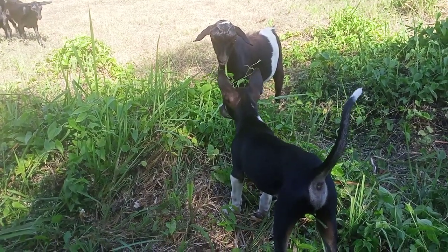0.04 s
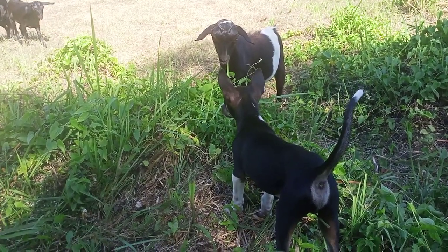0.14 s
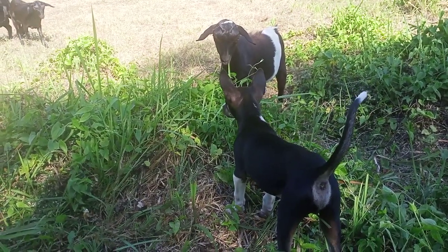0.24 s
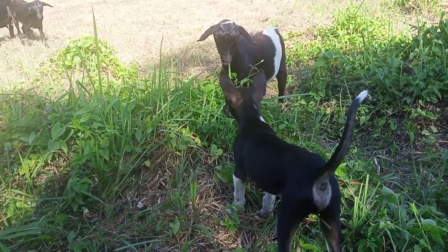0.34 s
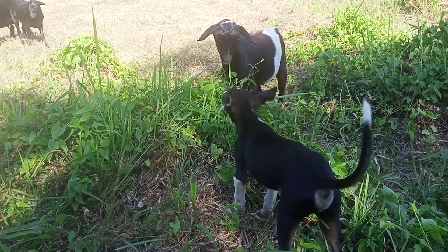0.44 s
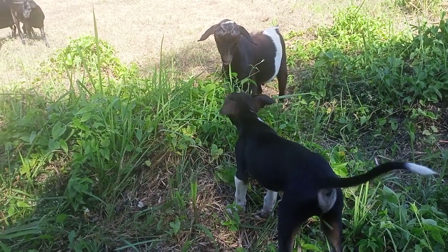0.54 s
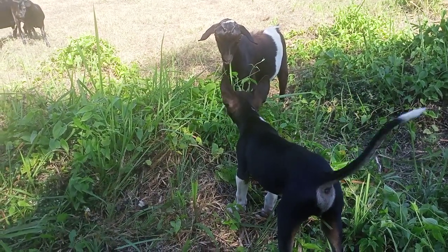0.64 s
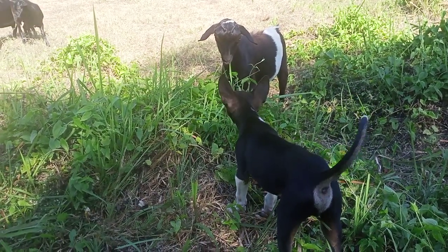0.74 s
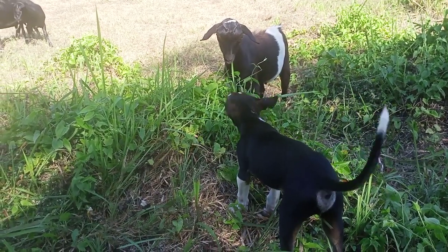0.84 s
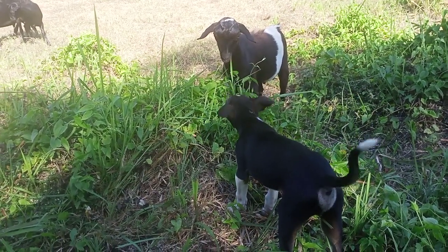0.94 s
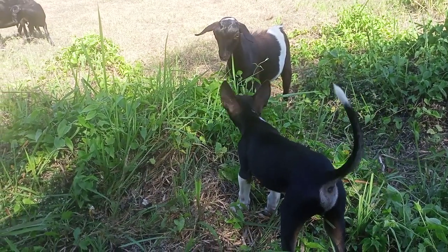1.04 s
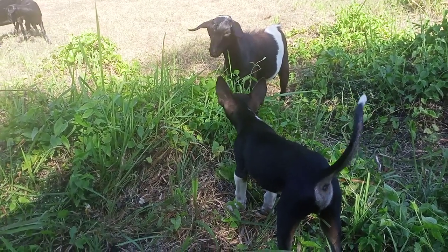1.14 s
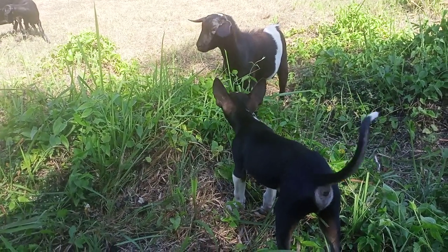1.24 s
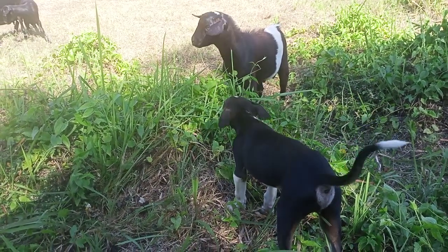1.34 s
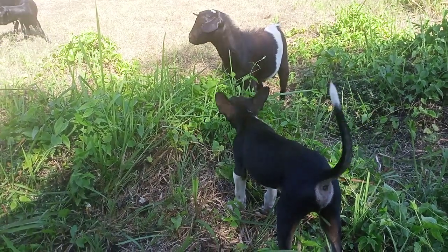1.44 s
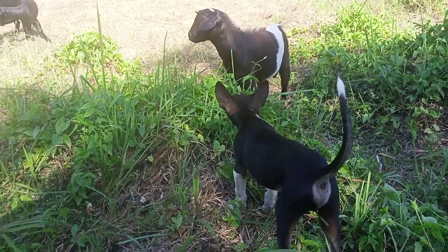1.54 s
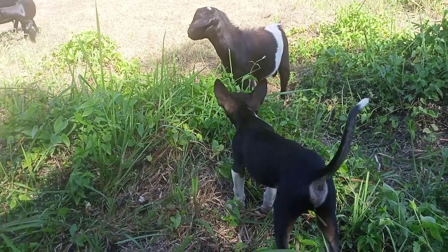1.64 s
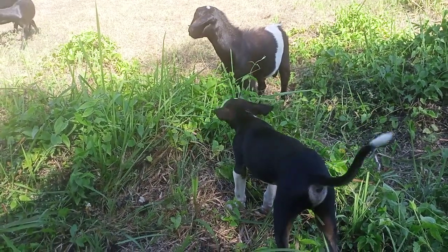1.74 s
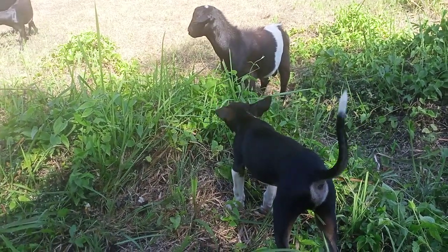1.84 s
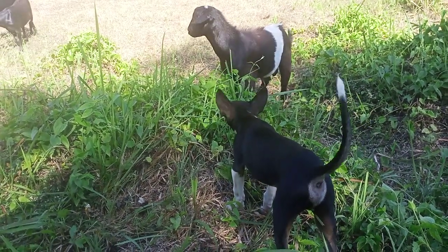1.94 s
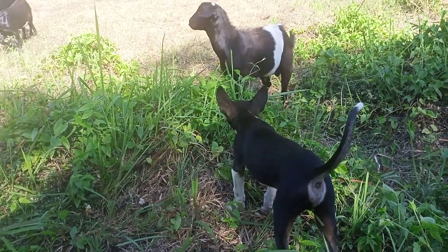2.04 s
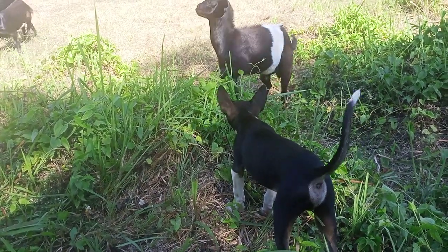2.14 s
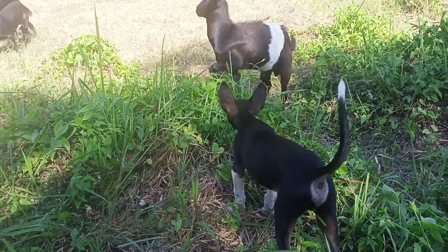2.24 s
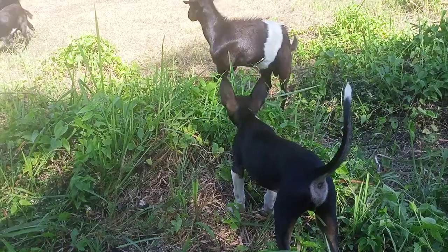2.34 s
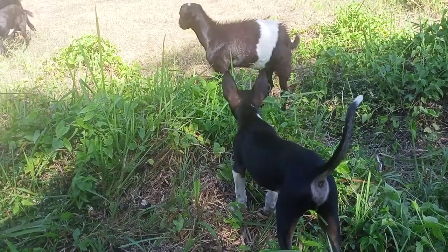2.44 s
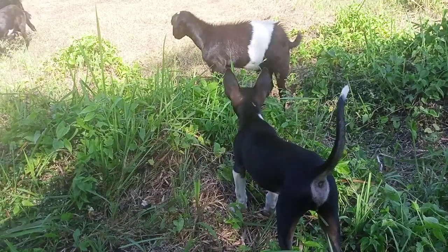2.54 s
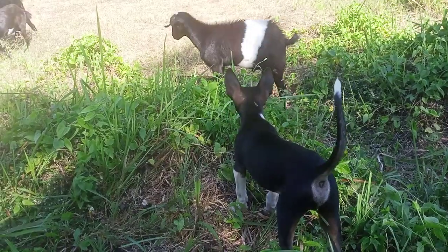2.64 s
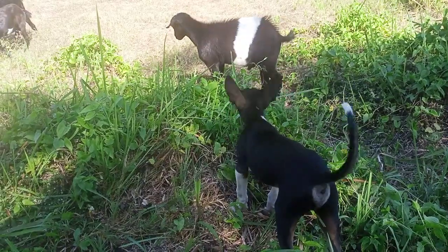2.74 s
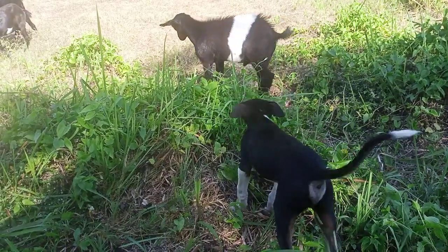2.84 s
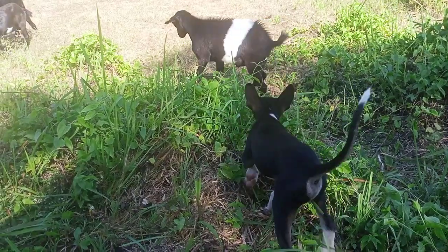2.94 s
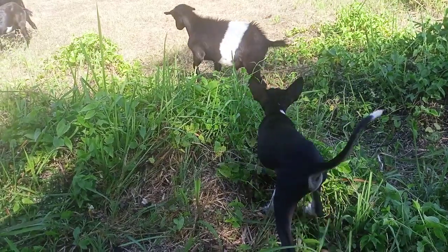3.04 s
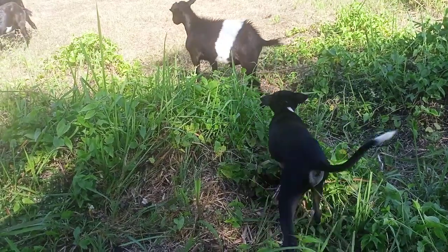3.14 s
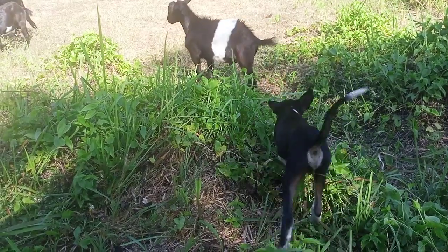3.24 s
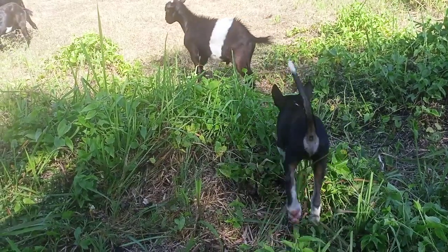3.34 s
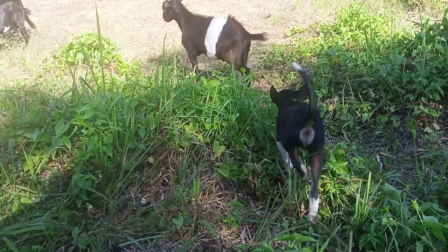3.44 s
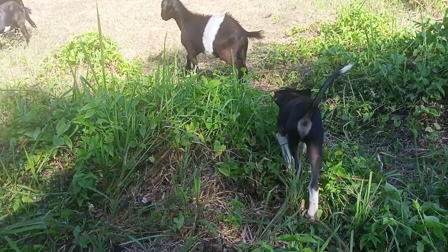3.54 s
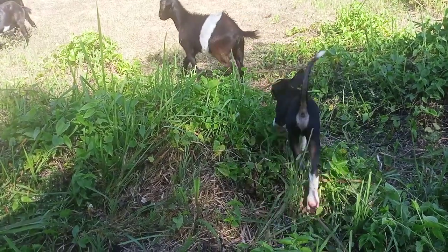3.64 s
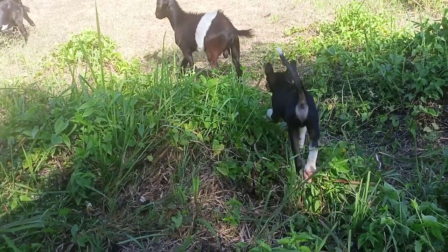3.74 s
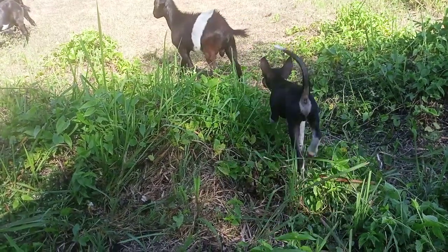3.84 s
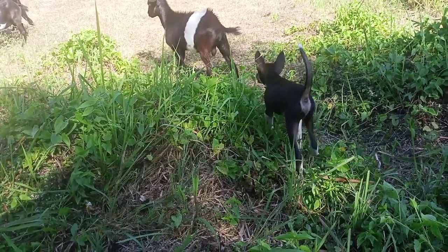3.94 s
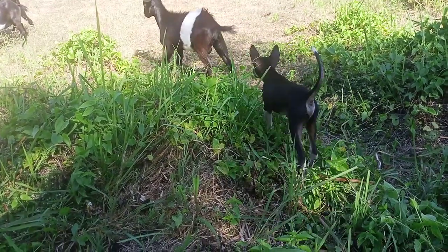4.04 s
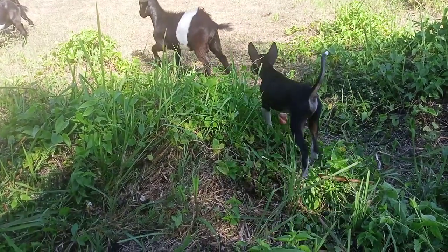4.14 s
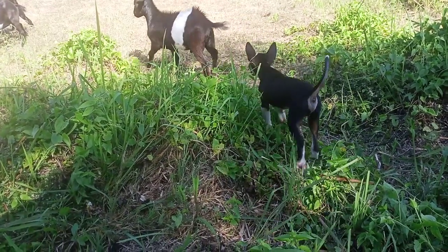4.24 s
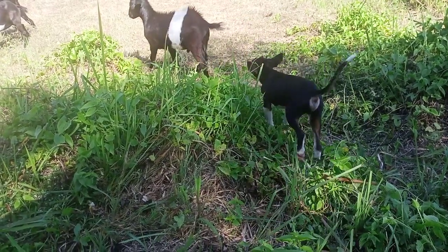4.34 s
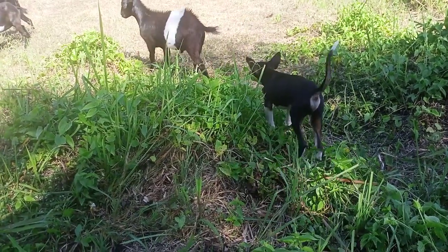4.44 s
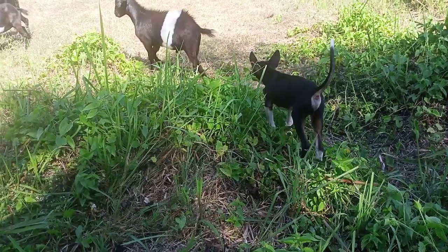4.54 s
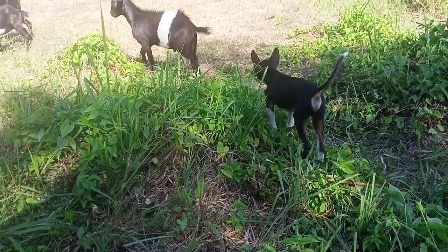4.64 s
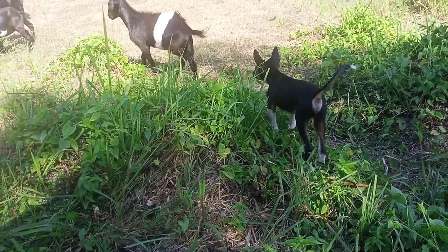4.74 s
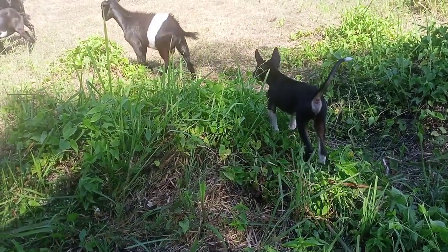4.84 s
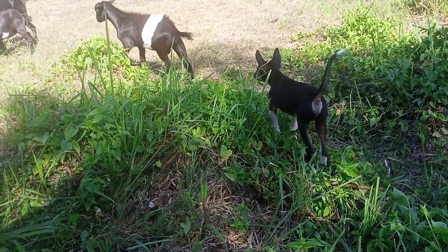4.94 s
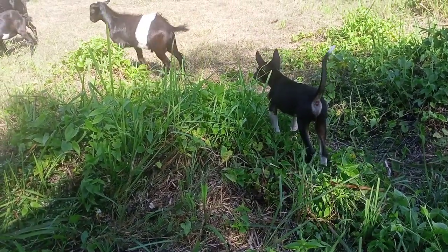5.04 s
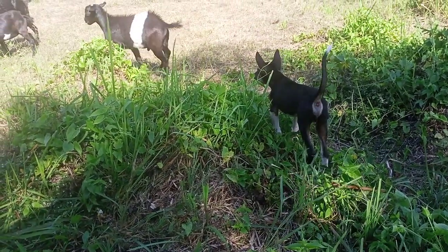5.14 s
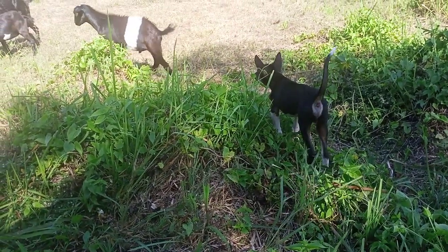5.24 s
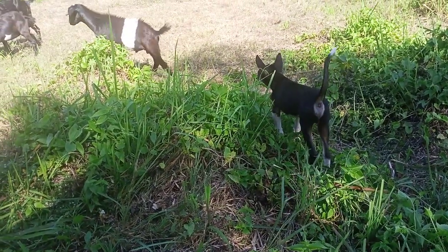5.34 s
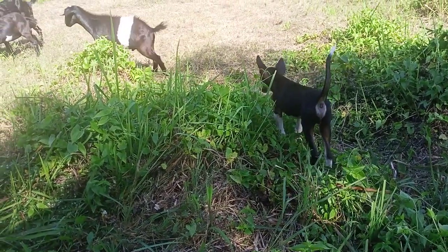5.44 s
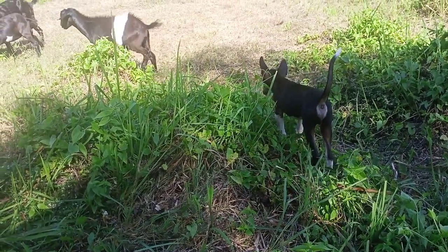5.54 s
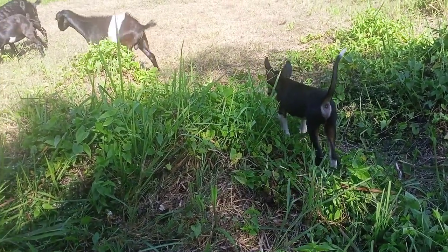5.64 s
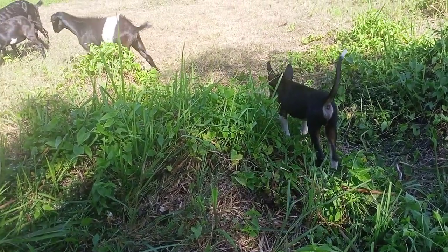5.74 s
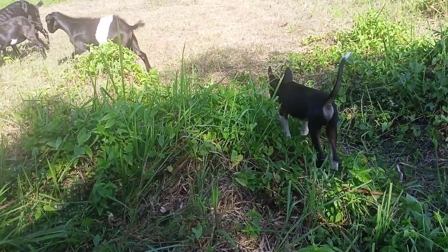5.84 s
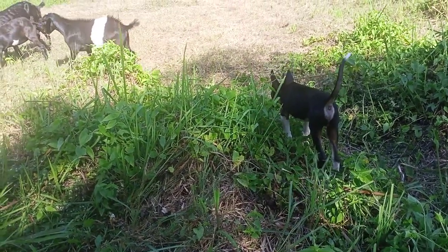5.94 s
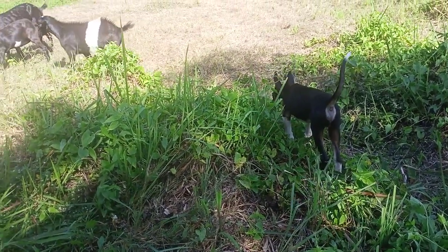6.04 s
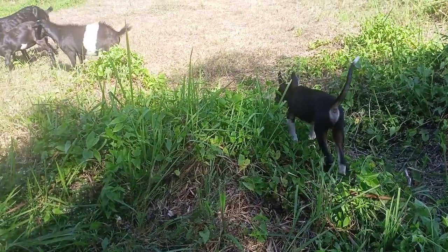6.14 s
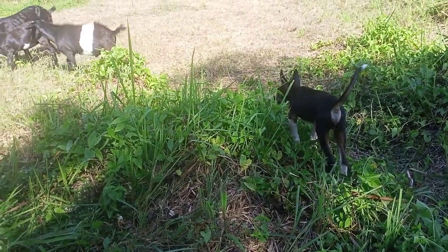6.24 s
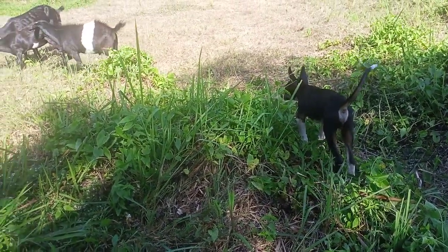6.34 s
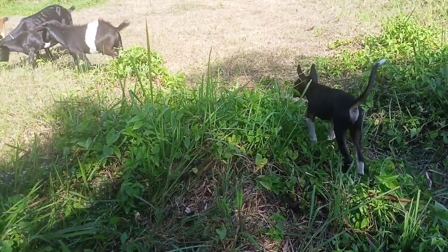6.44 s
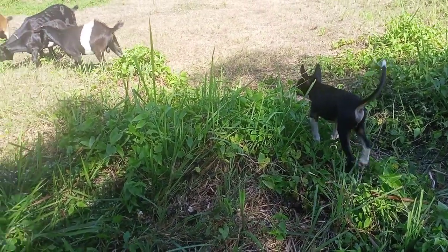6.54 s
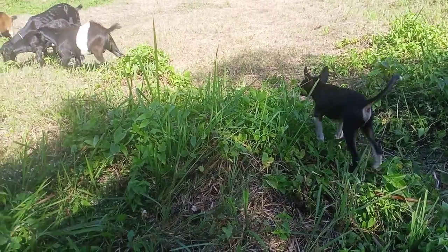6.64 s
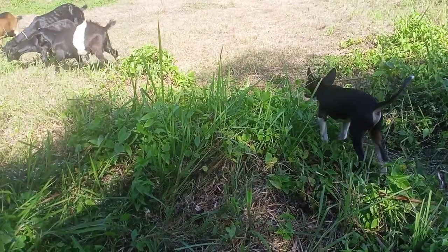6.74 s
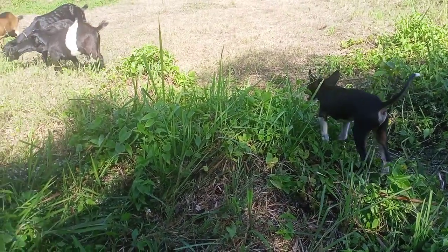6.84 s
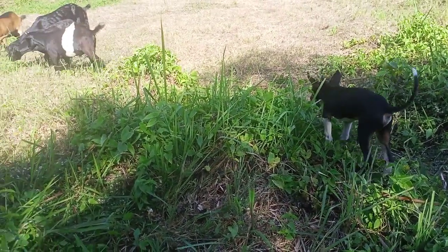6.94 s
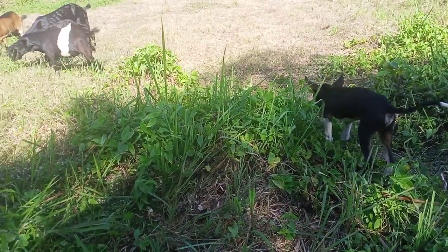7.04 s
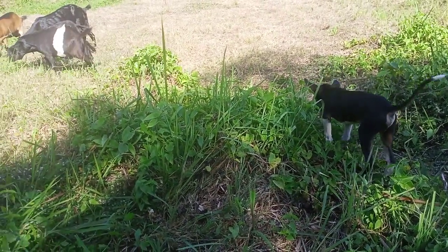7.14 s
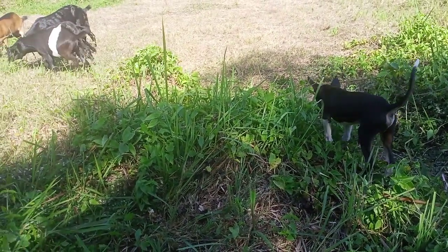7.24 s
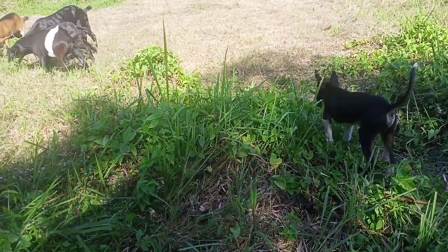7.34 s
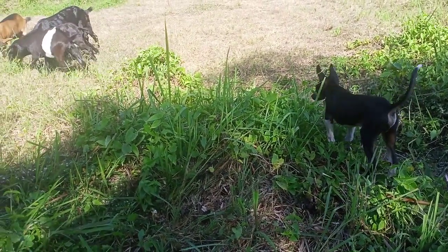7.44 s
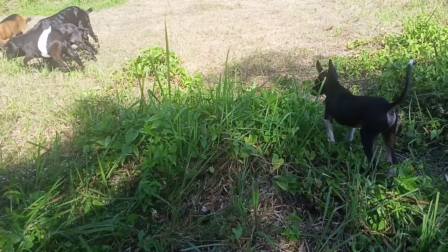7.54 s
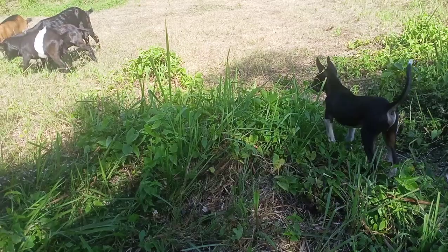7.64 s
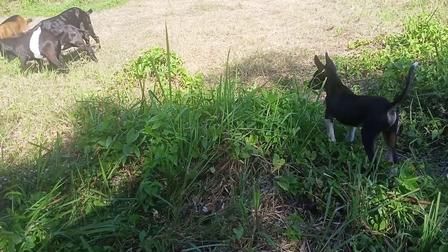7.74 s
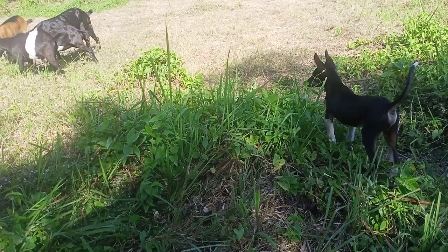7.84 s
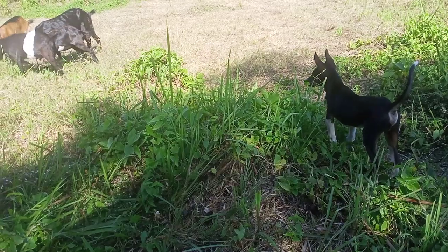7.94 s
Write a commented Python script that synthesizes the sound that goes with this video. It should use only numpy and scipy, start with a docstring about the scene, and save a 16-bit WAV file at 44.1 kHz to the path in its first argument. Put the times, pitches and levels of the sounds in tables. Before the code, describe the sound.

Loud, dry, very short high barks from a young dog dominate the first half, with a faint scattered echo from trees. Between them come dry grass swishes, soft paw thuds and thin rising bird whistles. After a tiny whimper and one last yap, only low field murmur, faint birds, small snaps and a puffing snort remain, in mono.

```python
"""Grassy field: a puppy yaps at a goat. Each yap is a sum of partials rising as the mouth opens, irregular
filtered pulses in the harsh middle, then a high squeal sliding down as the mouth shuts; a whimper comes once.
Trees echo it through a shaped noise burst. Birds and far notes are gliding or level sines; rustle, snaps, breath
and a snort are coloured noise, thuds are damped sines; a noise murmur and low wind lie below."""
import sys
import numpy as np
from scipy import signal
from scipy.fft import rfft, irfft
from scipy.io import wavfile
from scipy.ndimage import uniform_filter1d, minimum_filter1d

SR = 44100
rng = np.random.default_rng(int(sys.argv[2]) if len(sys.argv) > 2 else 0)


def inscribe(sig):
    """Save sig as 16-bit PCM at rate SR to the path in sys.argv[1].

    A 1-D sig is mono; a 2-D sig holds one channel per row.
    Samples are clipped to [-1, 1] before scaling.
    """
    pcm = np.round(np.clip(np.atleast_2d(sig).T, -1, 1) * 32767)
    wavfile.write(sys.argv[1], SR, pcm.astype(np.int16))


N = 352800


def amp(db):
    """Decibels to gain."""
    return 10 ** (np.asarray(db) / 20)


def rms_one(x):
    """Scale to rms 1."""
    return x / np.sqrt(np.mean(x ** 2) + 1e-20)


def band_one(x, low_hz, high_hz):
    """Scale so that one band has rms 1."""
    band = signal.sosfilt(signal.butter(3, [low_hz, high_hz], "band", fs=SR, output="sos"), x)
    return x / np.std(band)


def ramp(t, start, stop):
    """0 before start, 1 after stop, straight between."""
    return np.clip((t - start) / (stop - start), 0, 1)


def drift(rate_hz):
    """Slow noise of rms 1."""
    r = np.exp(-2 * np.pi * rate_hz / SR)
    return rms_one(signal.lfilter([1], [1, -2 * r, r * r], rng.standard_normal(N + SR))[SR:])


def colour(x, spectrum):
    """Filter by a table of freq_hz, gain_db, interpolated over log frequency."""
    hz = np.maximum(np.fft.rfftfreq(len(x), 1 / SR), 1)
    at_hz, gain_db = np.transpose(spectrum)
    gain = amp(np.interp(np.log(hz), np.log(at_hz), gain_db))
    return irfft(rfft(x) * gain, len(x))


def crackle(per_s, share):
    """Hiss mixed with random small clicks."""
    hits = rng.random(N) < per_s / SR
    strength = amp(4.8 * rng.exponential(1, N).clip(0, 4))
    grains = hits * strength * rng.choice([-1, 1], N)
    return share * rms_one(grains) + rng.standard_normal(N)


def partial(hz, level_db, k=1):
    """Sine at multiple k of a moving pitch, at an rms level."""
    return np.sqrt(2) * amp(level_db) * np.sin(k * 2 * np.pi * np.cumsum(hz) / SR)


def play(tables, fade_s):
    """Columns of several tables along time, and a gate open only while a table lasts."""
    t, rows, gate = np.arange(N) / SR, np.vstack(tables), np.zeros(N)
    for table in tables:
        to_edge_s = np.minimum(t - table[0][0], table[-1][0] - t)
        gate += np.clip(to_edge_s / fade_s + .5, 0, 1)
    rows = rows[np.argsort(rows[:, 0])]
    return np.minimum(gate, 1), [np.interp(t, rows[:, 0], c) for c in rows.T[1:]]


# murmur spectrum: freq_hz, density_db (relative)
FIELD_COLOUR = [(15, -80), (25, -39.5), (82, -2), (209, -6.5), (389, -7.5), (582, -9), (666, -10.5),
                (1410, -13.5), (1710, -13.5), (2560, -9.5), (2920, -9.5), (3340, -8.5), (3930, -21.5),
                (8130, -28), (15500, -36.5)]
FIELD_DB = -63


def field():
    """Steady coloured murmur with sparse clicks and a wavering level."""
    level_db = FIELD_DB + 0.46 * drift(8.7) + 2.7 * drift(15)
    return amp(level_db) * rms_one(colour(crackle(410.0, share=0.33), FIELD_COLOUR))


WIND_DB = -74


def wind():
    """Lumpy low noise on the microphone."""
    low = signal.sosfilt(signal.butter(2, [60, 220], "band", fs=SR, output="sos"), rng.standard_normal(N))
    return amp(WIND_DB + 5.5 * drift(3.7) + 1.8 * drift(5.1)) * rms_one(low)


# grass swells: centre_s, half_width_s, level_db (rms, 8-17 kHz)
RUSTLE = [(0.728, 0.04, -66.5), (2.332, 0.14, -71.5), (3.02, 0.033, -62.5), (3.33, 0.047, -67.5),
          (3.3, 2.1, -72), (3.8, 0.04, -64), (4.0, .15, -89), (4.75, 0.2028, -101), (5.27, 0.07, -68),
          (5.95, 0.06, -81.5), (6.249, 0.051, -87), (6.5, 1.24, -86), (6.78, 0.046, -76),
          (7.22, 0.061, -75.5), (7.7, 0.056, -90)]
# dry grass spectrum: freq_hz, density_db (relative)
RUSTLE_COLOUR = [(880, -41.5), (1500, -9.5), (1670, -1), (2310, -6.5), (2470, -3), (2970, 0.5), (3440, 0.5),
                 (6370, -28), (8460, -6.5), (10900, -33), (15500, -27.5)]


def rustle():
    """Swelling hiss with dense small grains of dry blades."""
    t = np.arange(N) / SR
    level = sum(amp(db) * np.exp(-((t - s) / half_s) ** 2) for s, half_s, db in RUSTLE)
    blades = colour(crackle(1500.0, share=0.62), RUSTLE_COLOUR)
    return level * amp(1.1 * drift(20)) * band_one(blades, 8000, 17000)


# yap moments: start_s, break_s, squeal_s, rasp_end_s, shut_s, end_s
YAP_TIMES = [(.396, .470, .495, .506, .507, .576), (.800, .858, .893, .902, .904, .968),
             (1.245, 1.300, 1.333, 1.347, 1.345, 1.443), (1.675, 1.728, 1.728, 1.772, 1.773, 1.936),
             (2.731, 2.797, 2.808, 2.832, 2.841, 2.937), (3.080, 3.122, 3.147, 3.155, 3.175, 3.251),
             (3.432, 3.497, 3.508, 3.516, 3.535, 3.612), (4.255, 4.314, 4.314, 4.362, 4.376, 4.438)]


def yap_columns(table):
    """Per sample, the row of the yap under way or about to start."""
    which = np.searchsorted(np.array(YAP_TIMES)[1:, 0] - .02, np.arange(N) / SR)
    return np.array(table, float)[which].T


# throat limit on high partials: freq_hz, gain_db (relative to the loudest partial)
THROAT_TOP = [(3000, -15.5), (4200, -22.5), (4800, -59.5), (7000, -66), (8500, -55.5), (10500, -57)]


def weak_partials(hz, loudest_db):
    """Partials 7-10, weakened by the throat, flickering in level."""
    top_hz, top_db = np.transpose(THROAT_TOP)
    out = 0
    for k in range(7, 11):
        out = out + partial(hz, loudest_db + np.interp(k * hz, top_hz, top_db) + drift(70), k)
    return out


# yap pitches: first_hz, top_hz, broken_hz, squeal_hz, slide_aim_hz, last_hz, slide_time_s
YAP_PITCH = [(720, 950, 990, 1750, 400, 440, .020), (705.7, 968, 885, 1710, 400, 410, 0.014),
             (697.3, 962, 900, 1700, 480, 260, .016), (675, 930, 845, 1695, 340, 525, 0.02),
             (868, 975, 895, 1740, 540, 485, .011), (724, 880, 835, 1650, 400, 415, .019),
             (661.6, 930, 860, 1675, 580, 350, .011), (685, 960, 862, 1680, 570, 440, 0.012)]
# yap levels: fundamental_db, first_overtones_db, open_overtones_db, early_rasp_db, rasp_db, squeal_db, slide_db,
# fundamental_break_change_db, overtones_break_change_db, half_pitch_growl_db
YAP_LEVEL = [(-11, -34, -19, -34.5, -26.5, -27, -37, -6, 2, -41.5),
             (-10.5, -23.5, -13, -43, -22, -23, -34, -17, -9.5, -58.5),
             (-11.5, -24, -13.5, -42.5, -25.5, -24.5, -33.5, -10.5, -4, -58),
             (-9.5, -22, -14, -51.5, -27, -12.5, -37, -11.5, 0.5, -58.5),
             (-10, -26.5, -12, -46, -24.5, -17, -36, -12.5, -8.5, -59),
             (-11, -23, -10.5, -45, -29.5, -6, -37, -14, -2.5, -61),
             (-12, -23, -11.5, -55, -27.5, -7.5, -33, -6.5, -5, -58.5),
             (-14, -20, -12.5, -43.5, -21.5, -10, -32.5, -12.5, -14, -58.5)]
# yap pace: attack_s, climb_s, squeal_snap_s
YAP_PACE = [(0.031, .060, .015), (.004, .052, .013), (.004, .052, .014), (0.0025, .048, .012),
            (.005, 0.04035, .011), (0.0037, .030, .014), (0.0031, .042, .006), (0.0059, .032, .005)]
# open mouth's favour: partial_2_db, partial_3_db, partial_4_db
YAP_VOWEL = [(-2.5, 3.5, -1.5), (-2.5, 0.5, 3.5), (1, -0.5, 0), (-2, 1.5, -3), (1.5, -0.5, 0), (7, 1, 1),
             (3, -0.5, -0.5), (0.5, -8, 2.5)]
# throat resonances: freq_hz, narrow_mouth_db, wide_mouth_db
THROAT = [(1360, -16, -22), (1530, -12.5, -22), (1731, -11, -11), (1910, -1, 0), (2100, 4.5, -10),
          (2300, -14, -11), (2550, -4.5, -12.5), (2872, -2, -4), (3058, -3, -16.5), (3536, -3.5, -27.5),
          (3620, -13.5, -15), (4226, -20, -35.5), (4860, -45.5, -51), (6024, -49.5, -59)]
RISE_BEND, LATE_CLIMB = 1.4, .15        # curve of the climb; share of it spread from start to break
SWELL_DB, SWELL_SHARE = -14.5, 0.61     # fundamental starts this low, full at this share of the rise
OPEN_FROM, OPEN_BY = 0.38, 0.98         # shares of the rise between which the mouth opens
BREAK_S, BROKEN_TIRES_DB, VOICE_STOPS_S = .006, -5, 0.004


def voice(disorder):
    """Partials rise and swell as the mouth opens, drop at the break; disorder shakes pitch and strength."""
    t, (start, broke, _, over, _, _) = np.arange(N) / SR, yap_columns(YAP_TIMES)
    attack_s, climb_s, _ = yap_columns(YAP_PACE)
    first_hz, top_hz, broken_hz = yap_columns(YAP_PITCH)[:3]
    voice_db, first_db, open_db, *_, lost_db, overtones_lost_db, growl_db = yap_columns(YAP_LEVEL)
    vowel_db = [*yap_columns(YAP_VOWEL), 0, 0]
    rise = ramp(t, start, start + climb_s)
    broken = ramp(t, broke, broke + BREAK_S)
    mouth = ramp(rise, OPEN_FROM, OPEN_BY)
    shake = np.clip(disorder / 0.045, 0, 1)

    early_climb = np.sin(np.pi / 2 * rise ** RISE_BEND)
    climb = (1 - LATE_CLIMB) * early_climb + LATE_CLIMB * ramp(t, start, broke)
    hz = first_hz + (top_hz - first_hz) * climb + (broken_hz - top_hz) * broken
    hz = hz * (1 + .025 * shake * drift(150))

    fundamental_db = voice_db + SWELL_DB * (1 - ramp(rise, 0, SWELL_SHARE))
    fundamental_db = fundamental_db + lost_db * broken + BROKEN_TIRES_DB * ramp(t, broke, over)
    out = partial(hz, fundamental_db + (1.0 + 2.3 * shake) * drift(51))

    at_hz, narrow_db, wide_db = np.transpose(THROAT)
    for k in range(2, 7):
        shut_db = first_db + np.interp(k * hz, at_hz, narrow_db)
        wide_open_db = open_db + vowel_db[k - 2] + np.interp(k * hz, at_hz, wide_db)
        level_db = (1 - mouth) * shut_db + mouth * wide_open_db + overtones_lost_db * broken
        out = out + partial(hz, level_db + (1.0 + 6.0 * shake) * drift(95), k)
    out = out + mouth * sum(partial(hz, growl_db + 2.9 * drift(60), k) for k in (.5, 1.5, 2.5))
    out = out + weak_partials(hz, np.maximum(fundamental_db, open_db - 2.5))
    gate = ramp(t, start - .001, start + attack_s) * (1 - ramp(t, over - VOICE_STOPS_S, over))
    return gate * out


# rasp spectrum: freq_hz, density_db (relative)
HARSH_COLOUR = [(120, -80), (200, -48), (575, -34.5), (923, -5.5), (1480, -14.5), (1740, 0.5),
                (2250, -14.5), (2600, -5), (2960, -13), (4100, -20.5), (4580, -45), (6960, -62),
                (8820, -41), (11000, -65), (15500, -59.5)]
MEDIAN_BEATS_PER_S, WOBBLE = 870.0, .35   # wobble: spread of log rate
RASP_RISE_S, RASP_PEAK_SHARE, RASP_TAIL_S = 0.034, 0.32, .03   # share: from break to rasp end
RASP_SHUT_DB, RASP_DROP_DB, RASP_CHOP_DB = -6, -12, 3.0


def harsh():
    """Uneven pulses at uneven gaps through the throat, peaking after the break; also returns their level."""
    t, (start, broke, _, over, _, _) = np.arange(N) / SR, yap_columns(YAP_TIMES)
    attack_s = yap_columns(YAP_PACE)[0]
    early_db, rasp_db = yap_columns(YAP_LEVEL)[3:5]
    peak = broke + RASP_PEAK_SHARE * (over - broke)
    level_db = early_db + (rasp_db - early_db) * ramp(t, peak - RASP_RISE_S, peak)
    level_db = level_db + RASP_SHUT_DB * ramp(t, peak, over)
    level_db = level_db + RASP_DROP_DB * ramp(t, over - .004, over + 0.0036)
    gate = ramp(t, start, start + attack_s) ** 2 * np.exp(-np.maximum(t - over, 0) / RASP_TAIL_S)
    level = gate * amp(level_db)

    beats_per_s = MEDIAN_BEATS_PER_S * np.exp(WOBBLE * drift(500))
    beats = np.diff(np.floor(np.cumsum(beats_per_s) / SR), prepend=0)
    pulses = beats * amp(1.3 * rng.standard_normal(N)) + 0.01 * rng.standard_normal(N)
    rasp = band_one(colour(pulses, HARSH_COLOUR), 1150, 1500)
    return level * amp(RASP_CHOP_DB * drift(45)) * rasp, level


# closing mouth's colour: pitch_hz, tone_db, octave_db
SLIDE = [(328.2, -17, -20.5), (400, -6, -17.5), (475, 1, -14.5), (640, -9, -8.5), (819, 9, 0),
         (980, 2.5, 5), (1350, 8, -9), (1700, 8.5, 0)]
SQUEAL_ATTACK_S, SQUEAL_FROM_DB, SQUEAL_TIRES_DB = 0.0067, -13.5, -3.5
SQUEAL_SAG = .05                          # starts this share sharp
SQUEAL_OCTAVE_DB, THIRD_DB = -20.5, -10.5  # octave under the tone; third partial under the octave
DROP_TO_HZ, SHUT_S = 1007, 0.0029         # pitch snaps down to here, then slides
SLIDE_FADE_S, SLIDE_SAG_DB = 0.0036, -5


def squeal(disorder):
    """Near-pure second vibration: held, broken up by disorder, sliding down as the mouth shuts."""
    t, (_, _, onset, _, shut, end) = np.arange(N) / SR, yap_columns(YAP_TIMES)
    snap_s = yap_columns(YAP_PACE)[2]
    squeal_hz, aim_hz, last_hz, slide_s = yap_columns(YAP_PITCH)[3:]
    squeal_db, slide_db = yap_columns(YAP_LEVEL)[5:7]

    rest_hz = aim_hz + (last_hz - aim_hz) * ramp(t, shut, end)
    held_hz = squeal_hz * (1 + SQUEAL_SAG * (1 - ramp(t, onset, shut)))
    slide = np.exp(-np.maximum(t - shut - snap_s, 0) / slide_s)
    hz = rest_hz + (DROP_TO_HZ - rest_hz) * slide
    hz = hz + (held_hz - DROP_TO_HZ) * (1 - ramp(t, shut, shut + snap_s))

    closed = ramp(t, shut - .002, shut + SHUT_S)
    held_db = squeal_db + SQUEAL_TIRES_DB * ramp(t, onset, shut) ** 2
    held_db = held_db + SQUEAL_FROM_DB * (1 - ramp(t, onset, onset + SQUEAL_ATTACK_S))
    slide_db = slide_db + SLIDE_SAG_DB * ramp(t, shut, end) ** 2
    at_hz, tone_db, upper_db = np.transpose(SLIDE)
    level_db = (1 - closed) * held_db + closed * (slide_db + np.interp(hz, at_hz, tone_db))
    octave_db = (1 - closed) * (held_db + SQUEAL_OCTAVE_DB)
    octave_db = octave_db + closed * (slide_db + np.interp(hz, at_hz, upper_db))

    shake = np.clip(disorder / .04, 0, 1)
    hz = hz * (1 + .015 * shake * drift(220))
    third = partial(hz, octave_db + THIRD_DB, 3) * np.clip((1300 - hz) / 300, 0, 1)  # throat stops it when high
    gate = ramp(t, onset - .003, onset + .003) * (1 - ramp(t, end - SLIDE_FADE_S, end))
    breakup = np.clip(1 + 0.71 * shake * drift(70), 0, 1.6)
    return gate * breakup * (partial(hz, level_db) + partial(hz, octave_db, 2) + third)


# open-mouth air spectrum: freq_hz, density_db (relative)
BREATH_COLOUR = [(2820, -32), (4800, -5.5), (5220, -19), (6800, -13.5), (8770, -1), (10600, -19),
                 (15500, -12.5)]
BREATH_DB = -39   # at unit call power


def breath(call):
    """Air rushing through the open mouth: ragged treble hiss growing faster than the call."""
    effort = uniform_filter1d(call ** 2, size=400).clip(0) ** 0.96
    air = rms_one(colour(crackle(2400.0, share=0.71), BREATH_COLOUR))
    return amp(BREATH_DB + 4.2 * drift(80)) * effort * air


# tree returns: delay_s, level_db (relative)
ECHO = [(.02, -35), (.05, -39), (.12, -43), (.2, -42.5), (.3, -49), (.36, -50.5), (.5, -63), (.7, -72.5),
        (1.1, -86)]
# tree echo spectrum: freq_hz, gain_db
ECHO_COLOUR = [(200, -6.5), (600, -11.5), (1000, -5.5), (1800, 1.76), (3000, 3), (4500, 2.5), (9000, -16.5)]


def trees(x):
    """Countless scattered returns: a noise burst shaped by delay; stirring leaves smear the tones."""
    delay_s, level_db = np.transpose(ECHO)
    t = np.arange(int(1.2 * SR)) / SR
    shape = amp(np.interp(t, delay_s, level_db, -200, -200) - 20)
    returns = colour(rng.standard_normal(len(t)), ECHO_COLOUR) * shape
    return signal.fftconvolve(x * (.85 + .5 * drift(60)), returns)[:N]


# soft low thuds, paws or jaws: start_s, envelope_peak_db, pitch_hz
THUDS = [(0.513, -49, 144), (0.9, -39.5, 291), (1.35, -42, 246.5), (1.655, -47, 175.7), (2.185, -33, 332),
         (2.843, -43.5, 394), (3.174, -48, 250), (3.791, -40, 250), (4.382, -43.5, 159.7),
         (7.009, -35, 257), (7.031, -38, 480)]


def thuds():
    """Each thud is about one soft cycle of a sine."""
    t, out = np.arange(N) / SR, np.zeros(N)
    for s, peak_db, hz in THUDS:
        envelope = np.exp(-((t - s - .004) * hz / 0.5) ** 2)
        out += amp(peak_db) * envelope * np.sin(2 * np.pi * hz * (t - s))
    return out


# rising whistle: time_from_start_s, pitch_hz, level_db (rms, before the call's gain)
BIRD = [(0, 4609, -64.5), (.012, 4830, -55.5), (.044, 5340, -53.5), (0.105, 5755, -51), (.135, 6250, -47),
        (.155, 6660, -54), (.165, 6504, -61.5)]
# whistle calls: start_s, gain_db
BIRD_CALLS = [(.632, -1), (1.903, 1), (4.565, 0.9), (6.9, -7.5)]
# higher bird: time_s, pitch_hz, level_db (rms)
HIGH_BIRD = [(5.15, 7560, -59.5), (5.17, 7530, -53), (5.21, 7589, -65), (5.24, 7880, -39),
             (5.29, 8200, -46.5), (5.326, 8360, -51.5), (5.34, 8672, -64.5), (5.37, 8650, -66)]


def birds():
    """Rising sine whistles with a slight flutter."""
    calls = [[(start + s, hz, level_db + db) for s, hz, level_db in BIRD] for start, db in BIRD_CALLS]
    gate, (hz, level_db) = play(calls + [HIGH_BIRD], fade_s=.01)
    return gate * partial(hz * (1 + 0.0044 * drift(60)), level_db + 2.5 * drift(40))


# dry stalks snapping: time_s, nominal_peak_db (12 dB over rms in 5.3-14 kHz)
SNAPS = [(2.004, -47), (3.0302, -42), (3.86, -31.5), (4.2345, -59.5), (4.7401, -56), (4.8804, -66),
         (5.5252, -66), (5.593, -65), (6.232, -48.5), (6.7528, -70), (6.795, -47)]


def snaps():
    """Sudden noise bursts with the colour of the grass, dying in milliseconds."""
    level, t = np.zeros(N), np.arange(N) / SR
    for s, peak_db in SNAPS:
        level += (t >= s) * amp(peak_db - 12.0) * np.exp(-np.abs(t - s) / .004)
    return level * band_one(colour(rng.standard_normal(N), RUSTLE_COLOUR), 5300, 14000)


# far notes: start_s, length_s, pitch_hz, level_db (rms)
FAR_NOTES = [(2.344, 0.082, 2500, -58.5), (3.993, 0.094, 2510, -60), (5.166, 0.029, 955, -49.5),
             (5.43, 0.11, 2520, -65.5), (5.899, 0.44, 3148, -73.5), (6.55, 0.197, 3117, -76.5),
             (7.75, 0.3, 2555, -67.5)]


def far_notes():
    """Faint sines from further off, near-level in pitch, wavering in strength."""
    notes = [[(s, hz, db), (s + length_s, hz, db)] for s, length_s, hz, db in FAR_NOTES]
    gate, (hz, level_db) = play(notes, fade_s=0.013)
    return gate * partial(hz * (1 + 0.0049 * drift(14.0)), level_db + 4.7 * drift(31.0))


# soft whimper: time_s, pitch_hz, fundamental_db (rms), overtones_db (rms, before each partial's gain)
WHIMPER = [(3.813, 537, -36.5, -47), (3.82, 543, -36, -40), (3.838, 560, -38, -38),
           (3.858, 557.6, -34.5, -34.5), (3.878, 543, -30.5, -34), (3.888, 490, -24, -44),
           (3.902, 430, -49, -55.5)]
# whimper partials 2-7: gain_db
WHIMPER_PARTIALS_DB = [-5.5, 2, -1.5, -1, -17, -14.5]


def whimper():
    """Short clean call on a low pitch; its overtones die as it falls."""
    gate, (hz, level_db, upper_db) = play([WHIMPER], fade_s=0.0018)
    out = partial(hz, level_db)
    for k, db in enumerate(WHIMPER_PARTIALS_DB, start=2):
        out = out + partial(hz, upper_db + db + 2.93 * drift(40), k)
    return gate * out


# snort puffs: start_s, low_db (below 5.5 kHz), high_db (above), decay_s
PUFFS = [(6.968, -29, -48, 0.014), (6.981, -30, -38.5, 0.013), (7.004, -38, -56, 0.012),
         (7.027, -37.5, -60, 0.013), (7.046, -53, -46, 0.0075), (7.075, -48.5, -58, 0.022),
         (7.325, -59.5, -56.5, 0.035)]
# snort spectrum: freq_hz, density_db (relative)
SNORT_COLOUR = [(50, -45), (90, -2), (300, 5.5), (700, -0.5), (1600, -0.5), (2800, 5.5), (3600, -2.5),
                (4600, -20.5), (6400, -31), (8200, -20), (11000, -35), (15500, -40)]
PUFF_ATTACK_S = 0.0045


def snort():
    """Fluttering, crackly run of air puffs; low and high bands have their own strength."""
    t, shapes = np.arange(N) / SR, []
    for s, _, _, decay_s in PUFFS:
        decay = np.exp(-np.maximum(t - s - PUFF_ATTACK_S, 0) / decay_s)
        shapes.append(ramp(t, s, s + PUFF_ATTACK_S) * decay)
    shapes = np.array(shapes)
    _, low_db, high_db, _ = np.transpose(PUFFS)
    air = colour(crackle(1200.0, share=0.47), SNORT_COLOUR)
    low = signal.sosfilt(signal.butter(4, 5500, fs=SR, output="sos"), air)
    high = signal.sosfilt(signal.butter(4, 5500, "high", fs=SR, output="sos"), air)
    puffs = amp(low_db) @ shapes * rms_one(low) + amp(high_db) @ shapes * rms_one(high)
    return amp(1.9 * drift(95)) * puffs


def scene():
    """All sources, the tree echo and the murmur of the field."""
    rasp, disorder = harsh()
    puppy = rasp + voice(disorder) + squeal(disorder) + whimper()
    song = birds()
    echo = trees(puppy + amp(9.5) * song)
    ground = rustle() + snaps() + thuds()
    mix = puppy + breath(puppy) + echo + song + far_notes() + snort() + ground + field() + wind()
    return mix[None]


CEILING, RECOVER_DB_PER_S, CUTOFF_HZ = .88, 300.5, 15600


def record(dry):
    """Microphone loses the deep bass, a look-ahead limiter holds the peaks, the top is cut."""
    x = signal.sosfilt(signal.butter(2, 60.0, "high", fs=SR, output="sos"), dry)
    over_db = 20 * np.log10(np.maximum(np.abs(x) / CEILING, 1))
    climb_db = RECOVER_DB_PER_S * np.arange(N) / SR
    held_db = np.maximum.accumulate(over_db + climb_db, axis=1) - climb_db
    smooth_db = uniform_filter1d(-minimum_filter1d(-held_db, size=161), size=81)
    top_cut = signal.ellip(12, .5, 70, CUTOFF_HZ, fs=SR, output="sos")
    return signal.sosfilt(top_cut, x * amp(-smooth_db))


dry = scene()
out = record(dry)
inscribe(out)
```